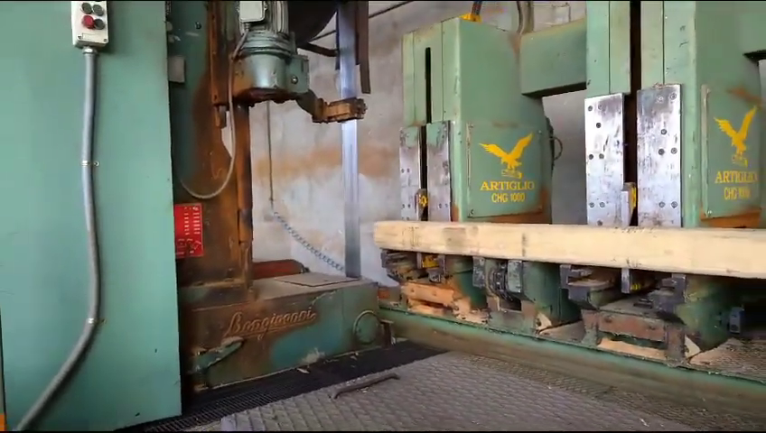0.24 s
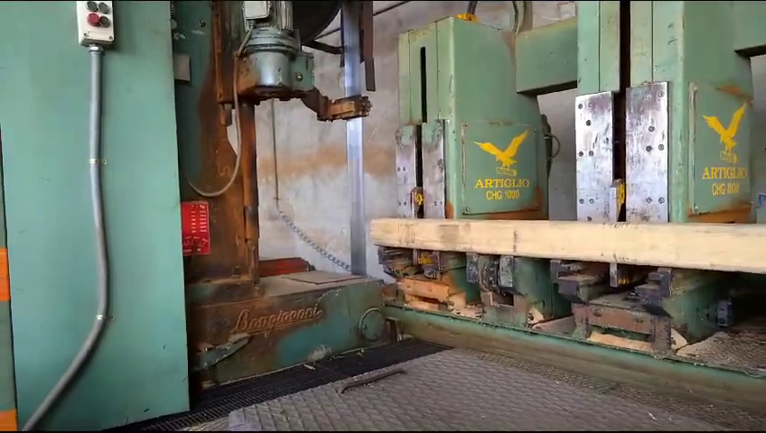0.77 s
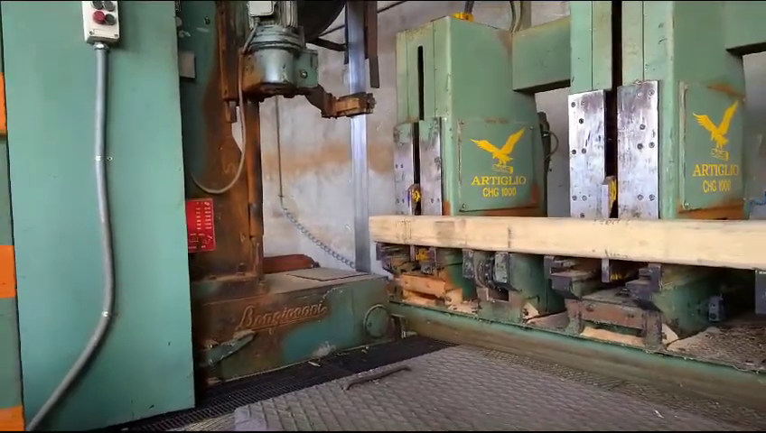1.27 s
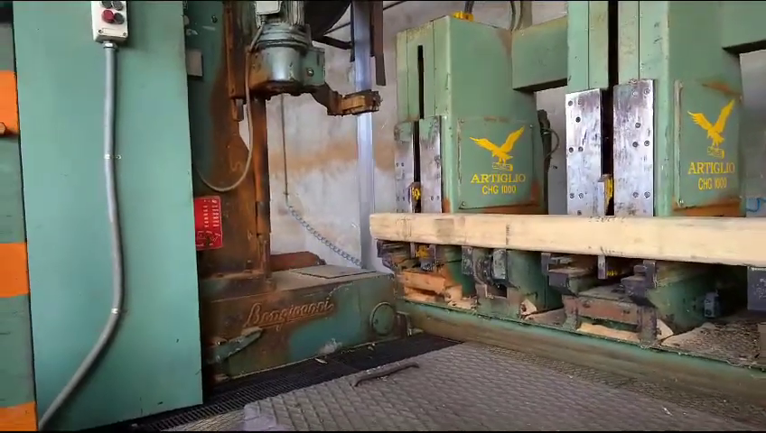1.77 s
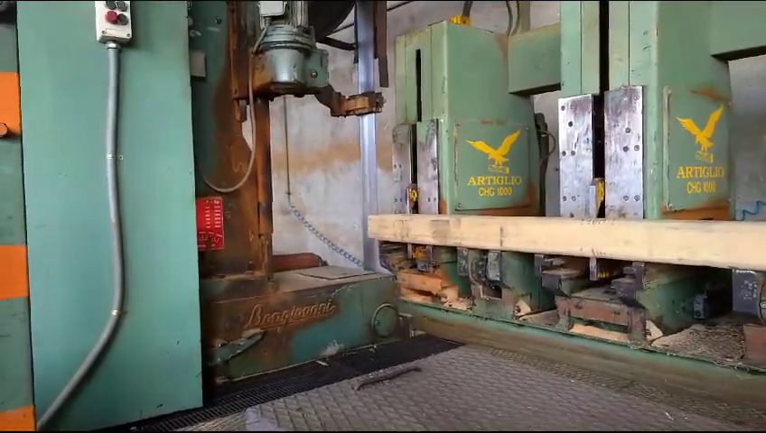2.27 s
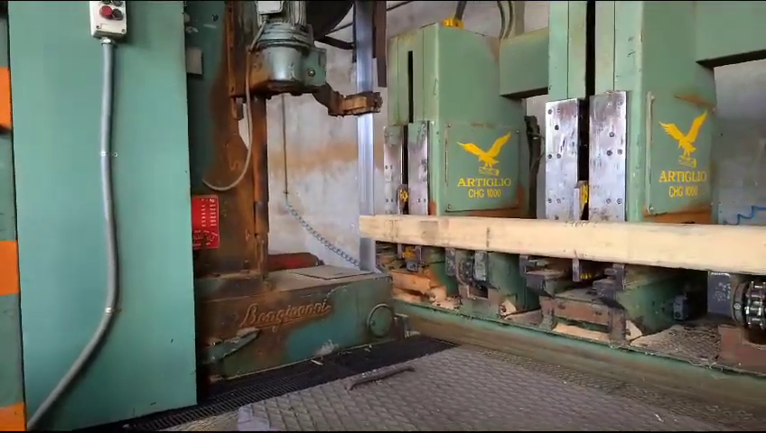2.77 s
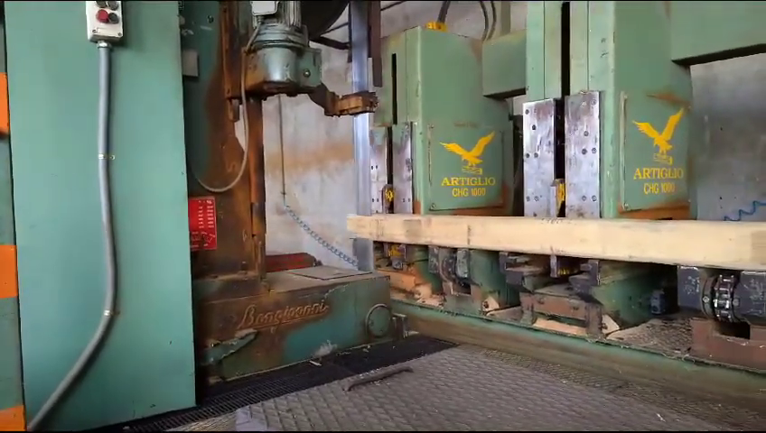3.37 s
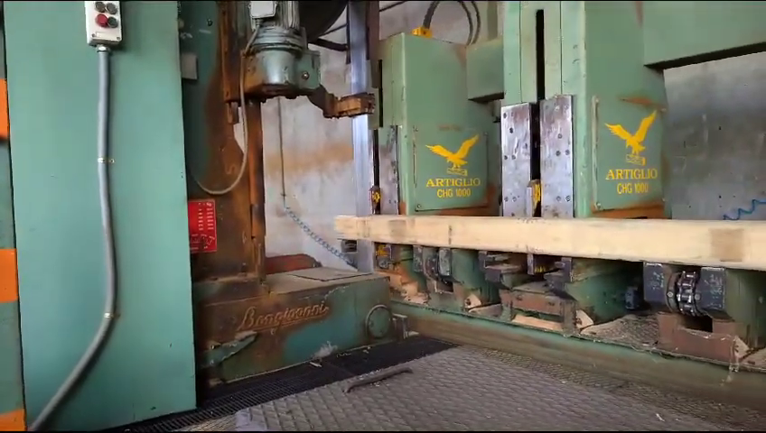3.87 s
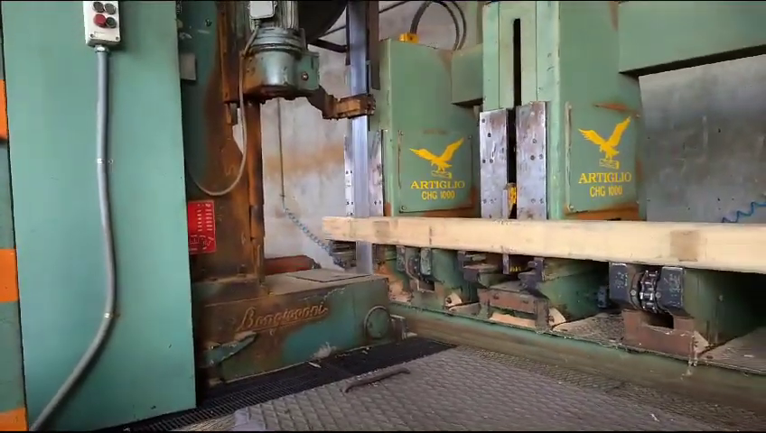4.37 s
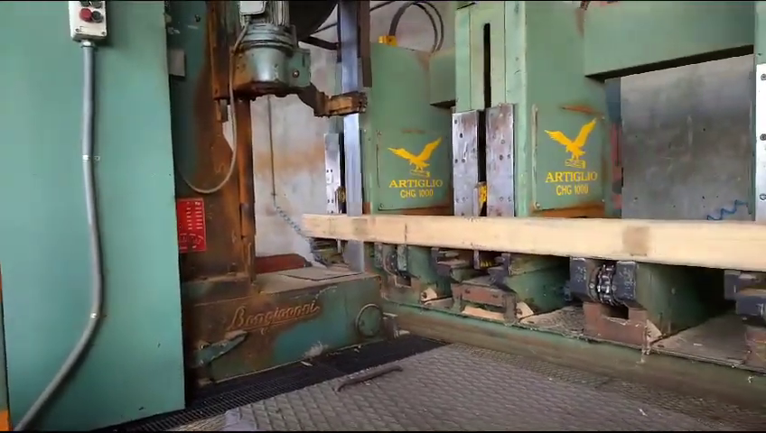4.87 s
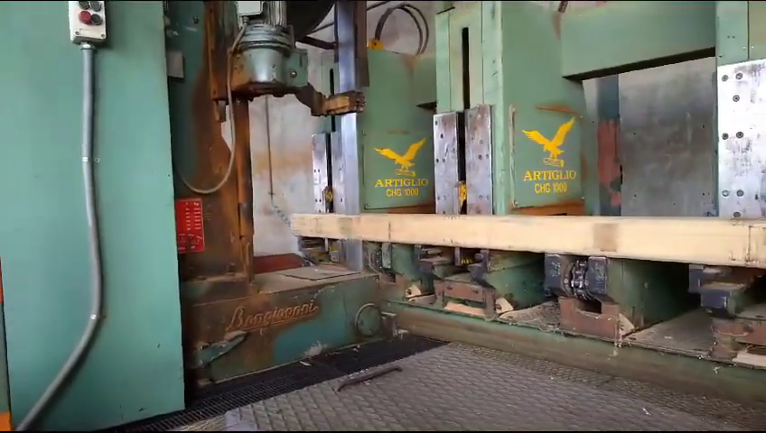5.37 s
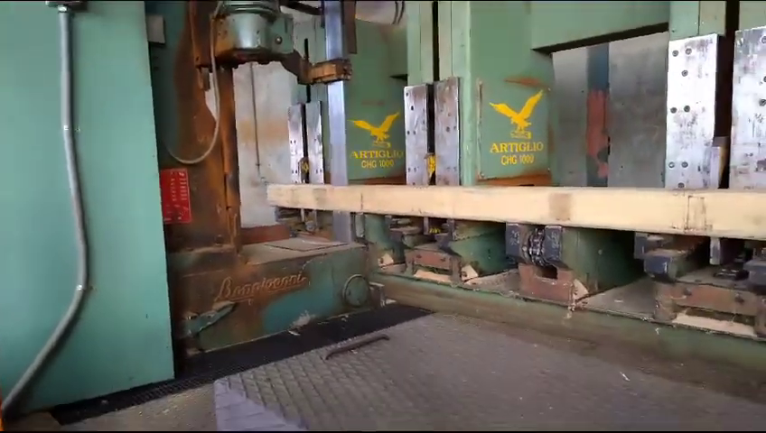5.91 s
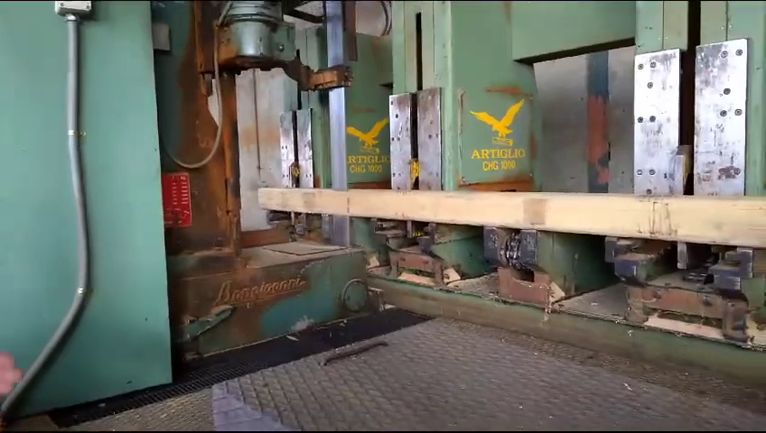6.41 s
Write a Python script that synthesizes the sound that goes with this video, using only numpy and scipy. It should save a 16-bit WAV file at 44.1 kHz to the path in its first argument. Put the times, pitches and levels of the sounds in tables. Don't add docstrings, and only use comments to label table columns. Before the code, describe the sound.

In a sawmill hall, a big band saw runs free for just over a second: broad motor and extraction roar, low hum, a thin whistle pulsing a few times a second. Then the teeth bite abruptly into a beam, a loud raspy metallic whine with bright chip hiss. It continues without a break, gradually easing, with a short squeak near the end. Stereo phone microphone a few metres away.

```python
import sys
import numpy as np
from scipy import signal
from scipy.fft import rfft, irfft
from scipy.io import wavfile
from scipy.ndimage import uniform_filter1d

SR = 44100
rng = np.random.default_rng(int(sys.argv[2]) if len(sys.argv) > 2 else 0)


def magnitude_from_level(level_db):
    exponent = np.asarray(level_db, float) / 20
    return 10 ** exponent


def wav_record(signal):
    frames = np.transpose(np.atleast_2d(signal))
    bounded = np.clip(frames, -1, 1)
    quanta = np.round(bounded * 32767).astype(np.int16)
    wavfile.write(sys.argv[1], SR, quanta)


N = 293265
T = np.arange(N) / SR

TOOTH_HZ = 795.5
BITE_S, BITE_RISE_S = 1.284, .022


def curves(table):
    s, *columns = np.transpose(table)
    return [np.interp(T, s, c) for c in columns]


def along(table, hz):
    f, v = np.transpose(table)
    return np.interp(np.log(hz + 1), np.log(f + 1), v)


def walk(rate, count=N, sr=SR, channels=1):
    k = max(int(sr / rate), 1)
    w = np.repeat(rng.standard_normal((channels, count // k + 1)), k, axis=1)[:, :count]
    w = uniform_filter1d(uniform_filter1d(w, k), k)
    return w / w.std()


def spell(start_s, length_s, edge_s):
    inside_s = np.minimum(T - start_s, start_s + length_s - T)
    return np.clip(inside_s / edge_s + .5, 0, 1)


def bump(hz, centre_hz, width_hz):
    return 1 / (1 + (2 * (hz - centre_hz) / width_hz) ** 2)


# frequency in Hz, lead of the left port in radians.
PORT_LEAD = [(1000, 0), (4000, .3), (8000, .9), (11000, 1.0), (13000, 1.9), (15000, 2.6)]


def port_delay(hz):
    return np.exp(-1j * along(PORT_LEAD, hz))


def wash(gain_db, like, size, lo_hz, hi_hz, flicker_db, flicker_hz, swell_db):
    hz, s, z = signal.stft(rng.standard_normal((2, N)), SR, nperseg=size)
    frames = 2 * SR / size
    patches = walk(flicker_hz, count=len(s), sr=frames, channels=24)
    place = 23 * np.sqrt(hz / hz[-1])
    low = place.astype(int).clip(0, 22)
    share = (place - low)[:, None]
    db = flicker_db * ((1 - share) * patches[low] + share * patches[low + 1])
    db = db + swell_db * walk(flicker_hz, count=len(s), sr=frames)

    colour_db, shape_db, balance_db = gain_db(hz, s)
    inside = (hz > lo_hz) & (hz < hi_hz)
    colour = magnitude_from_level(colour_db) / np.sqrt(np.sum(magnitude_from_level(2 * colour_db[inside])) / len(hz))

    c = along(like, hz).clip(-.95, .95)[:, None]
    mid, side = z[0] * np.sqrt((1 + c) / 2), z[1] * np.sqrt((1 - c) / 2)
    gain = colour[:, None] * magnitude_from_level(db + shape_db) / np.sqrt((1 + c) / 2)
    left = (mid + side) * magnitude_from_level(balance_db / 2)
    right = (mid - side) * port_delay(hz)[:, None] * magnitude_from_level(-balance_db / 2)
    pair = np.array([left, right])
    return signal.istft(pair * gain / np.sqrt(2), SR, nperseg=size)[1][:, :N]


def bite():
    return np.clip((T - BITE_S) / BITE_RISE_S, 0, 1)


# time in seconds, level in dB.
CUT = [(1.3, -18), (1.6, -18), (2.64, -20), (2.85, -22.5), (3.07, -22), (3.31, -24), (3.36, -21),
       (3.65, -23), (3.68, -27), (3.73, -23), (3.94, -23.5), (5.49, -24.5), (6.11, -26.5), (6.65, -25)]


def cut_db():
    return curves(CUT)[0] + 21.5


def beam_db():
    memory_s = .5
    return uniform_filter1d(cut_db(), int(memory_s * SR))


def cut_pan_db():
    turn_s, turn_length_s = 2.7, .34
    return -2.6 * np.clip(1 - (T - turn_s) / turn_length_s, 0, 1)


# start in seconds, length in seconds, resonance in Hz, lift in dB.
SWELLS = [(1.27, .165, 4000, 10), (1.32, 0.42, 2400, 4.5), (1.28, 0.16, 4800, 6), (1.55, .5, 1600, 3),
          (1.43, .57, 4000, 0.5), (1.85, 0.19, 800, 4), (1.3, 0.32, 800, 5.5), (2.0, .25, 7200, 2.5),
          (2.35, .1, 4000, -3), (2.5, 0.72, 1600, 7), (2.603, 1.08, 3200, 5), (2.6, .2, 3200, 3),
          (2.885, 0.195, 3200, 5.5), (3.268, 0.097, 3200, 5.5), (2.9, .3, 5600, 2), (2.994, 0.12, 800, 8),
          (3.35, 0.32, 4000, 4), (3.498, 0.067, 1600, 12), (3.655, 0.24, 8000, 5), (4.1, .2, 800, 3.5),
          (4.75, 0.18, 4000, 7), (5.55, .33, 5600, 2.5), (5.6, 0.67, 9550, -7), (6.204, .12, 6400, 4),
          (6.347, 0.34, 7200, 4.5)]


def swell_db(order):
    edge_s = .027
    return sum(db * spell(s, length, edge_s) for s, length, hz, db in SWELLS if round(hz / TOOTH_HZ) == order)


# frequency in Hz, level in dB per Hz.
HALL_COLOUR = [(20, -46), (60, -28.5), (190, -19.5), (260, -13.5), (500, -7), (900, -3.5), (1700, -0.5),
               (2600, -6), (3200, -8), (6000, -10), (10000, -10), (13000, -16), (14700, -15.5),
               (16500, -18)]
# frequency in Hz, left-right likeness from -1 to 1.
HALL_LIKE = [(60, 0.23), (130, 0.54), (290, 0.7), (640, 0.74), (1410, 0.54), (3100, 0.27), (6820, -0.057),
             (15000, 0.16)]
# frequency in Hz, left minus right in dB.
HALL_BALANCE = [(60, -1.5), (110, -1), (200, 0), (380, 0.0), (700, -0.5), (1290, 0.5), (2380, -0.5),
                (4400, -2.5), (8120, -1.5), (15000, -5.5)]
# frequency in Hz, width in Hz, lift in dB.
CASING = [(236.2, 5.7, 5.5), (412.6, 15.6, 8), (494, 6.2, 2), (597.5, 11.5, 9), (681.6, 12, 6),
          (781, 13, 6), (1242, 18, 4.5), (1530, 30, 3), (1495, 42, 3.5), (1748, 68, 5), (2254, 34, 8),
          (2457, 120, 7), (5170, 61, 6.5)]
# time in seconds, level in dB.
ROAR = [
    (0, -33.5),
    (1.3, -33),
    (1.8, -32),
    (2.4, -34),
    (3.3, -37),
    (4.0, -36),
    (4.9, -36),
    (5.4, -37.5),
    (6.0, -37),
    (6.65, -38),
]


def hall_roar():
    def gain_db(hz, s):
        rings = sum(db * bump(hz, f, w) for f, w, db in CASING)
        ripple = walk(1 / 11, count=len(hz), sr=1 / hz[1])[0]
        rings = rings + 2.2 * ripple.clip(-1.5, 1.5) * (hz < 1500)
        feed = -.5 * s * bump(hz[:, None], 300, 200)
        level = np.interp(s, *np.transpose(ROAR))
        return along(HALL_COLOUR, hz) + rings, level + feed, along(HALL_BALANCE, hz)[:, None]

    roar = wash(gain_db, HALL_LIKE, size=4096, lo_hz=200, hi_hz=1100, flicker_db=.6, flicker_hz=6, swell_db=.15)
    return roar * magnitude_from_level(3.5)


HUM_HZ = [95, 299]


def motor_hum():
    roar_db = curves(ROAR)[0]
    below_db = [-37.5 + 12 * spell(3.2, 4, .49), -20 + 6.5 * spell(1.35, 1.4, .49)]
    out = np.zeros(N)
    for hz, db in zip(HUM_HZ, below_db):
        level = magnitude_from_level(roar_db + db + 2.5 * walk(7.5)[0])
        out += level * np.sin(2 * np.pi * hz * T + .45 * walk(3.08)[0])
    return out


def tooth_whistle():
    whistle_hz, loop_s, weld_s = 796.5, .279, .25
    slip = .04 * bite() * walk(5)[0]
    throb = np.cos(np.pi * ((T - weld_s) / loop_s + slip)) ** 4
    throb = throb + .35 * np.clip((T - BITE_S) / 3, 0, 1) * (1 - throb)
    db = curves(ROAR)[0] + 1 - bite() + swell_db(order=1)
    db = db + bite() * (2 * walk(24.7)[0] - 5)
    return throb * magnitude_from_level(db) * np.sin(2 * np.pi * (whistle_hz * T + slip))


# time in seconds, pitch in Hz, level in dB.
SQUEAK = [
    (5.45, 2375, -42),
    (5.49, 2380, -32),
    (5.525, 2378, -25),
    (5.555, 2390, -26),
    (5.59, 2430, -27),
    (5.615, 2395, -33),
    (5.645, 2375, -33),
    (5.67, 2370, -44),
]


def squeak():
    hz, db = curves(SQUEAK)
    on = np.clip(np.minimum(T - SQUEAK[0][0], SQUEAK[-1][0] - T) / .02, 0, 1)
    level = np.sqrt(2) * on * magnitude_from_level(db + 1.5 * walk(60)[0])
    tone = level * np.sin(2 * np.pi * np.cumsum(hz) / SR + .3 * walk(90)[0])
    return tone * magnitude_from_level(np.array([[.6], [-.6]]))


# frequency in Hz, flutter per second, rms level in dB.
BLADE_RINGS = [(7310, 73, -47), (8670, 140, -41)]


def blade_rings():
    out = np.zeros((2, N))
    for hz, rate, db in BLADE_RINGS:
        w = walk(rate, channels=4)
        left, apart = w[0] + 1j * w[1], w[2] + 1j * w[3]
        right = (.8 * left + .6 * apart) * port_delay(hz)
        turn = np.exp(2j * np.pi * hz * T)
        out += magnitude_from_level(db + .46 * beam_db()) * np.real(np.array([left, right]) * turn)
    return out * bite()


# frequency in Hz, level in dB per Hz.
CHIP_COLOUR = [(600, -24.5), (1500, -4), (2500, -1.5), (4000, -1), (6500, -2), (10000, 0), (13000, -1),
               (14700, 2), (16500, 4)]
# frequency in Hz, left-right likeness from -1 to 1.
CHIP_LIKE = [(60, 0.37), (130, 0.49), (290, 0.71), (640, 0.69), (1410, 0.26), (3100, 0.13), (6820, 0.3),
             (15000, 0.036)]


def chips():
    def gain_db(hz, s):
        cut, beam, pan = (np.interp(s, T, c) for c in (cut_db(), beam_db(), cut_pan_db()))
        low = -60.5 + 1.14 * beam
        hiss = -59.5 + 1.18 * cut
        top = -64.5 + 1.6 * cut
        low_share = np.interp(hz, [4500, 7000], [1, 0])[:, None]
        top_share = np.interp(hz, [10500, 12500], [0, 1])[:, None]
        shape = hiss + low_share * (low - hiss) + top_share * (top - hiss)
        entry = np.exp(-np.abs(s - BITE_S) / .2) * bump(hz[:, None], 5000, 1000)
        return along(CHIP_COLOUR, hz), shape + 6 * entry, pan

    hiss = wash(gain_db, CHIP_LIKE, size=256, lo_hz=6100, hi_hz=11820, flicker_db=1.1, flicker_hz=20, swell_db=1.52)
    return hiss * bite() * magnitude_from_level(36)


# order of the tooth rate, rms level in dB.
BLADE = [(2, -37.4), (3, -34.0), (4, -37.6), (5, -37.3), (6, -39.3), (7, -37.1), (8, -33.8), (9, -31.9),
         (10, -32.5), (11, -31.4), (12, -27.2), (13, -30.5), (14, -35.2), (15, -36.0), (16, -34.1),
         (17, -34.3), (18, -41.5), (19, -36.8)]
FOLLOW = [1.9, 1.53, 1.25, 1.9, 1.2, 0.16, 0.54, 1.05, 1.1, 1.5, 1.46, 1.4, 2.17, 1.3, 1.3, 0.54, .5, 0.21]
ORDER_TRIM_DB = [-2.5, -4, -2, -2.5, 0, 0.3, -0.1, 0.7, 1.5, 0.4, 0.9, 0.8, 2, 4.5, 2.5, -2.5, -14, 6.5]


def teeth():
    cut, beam, pan_db = cut_db(), beam_db(), cut_pan_db()
    smear_hz, skirt_hz, alike = 14, 44, .8
    cycles = TOOTH_HZ * np.cumsum(1 + .0014 * walk(14)[0]) / SR
    load_db = 1.28 * walk(13)[0]
    out = np.zeros((2, N))
    for (k, db), follow, trim_db in zip(BLADE, FOLLOW, ORDER_TRIM_DB):
        db = db + trim_db + swell_db(k) + load_db * min(k / 8, 1) ** 2
        db = db + follow * (cut if k > 6 else beam)
        db = db + 1.87 * walk(11)[0] * np.clip((k - 5) / 4, 0, 1)

        share = .5 * min(k / 9, 1)
        core, skirt = walk(smear_hz * k, channels=4), walk(skirt_hz * k, channels=4)
        w = (np.sqrt(1 - share) * core + np.sqrt(share) * skirt) / np.sqrt(2)
        both, apart = w[0] + 1j * w[1], w[2] + 1j * w[3]

        steady = (.98 if k > 3 else .7) / (1 + (k / 6.8) ** 6)
        both = np.sqrt(steady) + np.sqrt(1 - steady) * both

        right = (alike * both + np.sqrt(1 - alike ** 2) * apart) * port_delay(k * TOOTH_HZ)
        turn = np.exp(2j * np.pi * (k * cycles + rng.random()))
        out += np.sqrt(2) * magnitude_from_level(db) * np.real(np.array([both, right]) * turn)
    return out * magnitude_from_level(np.array([pan_db, -pan_db]) / 2) * bite() * magnitude_from_level(-.2)


def scene():
    hall = hall_roar() + motor_hum() + tooth_whistle()
    return hall + squeak() + blade_rings() + chips() + teeth()


def top_cut(x):
    return signal.sosfilt(signal.butter(12, 15720, fs=SR, output="sos"), x)


def record(dry):
    spectrum = rfft(np.tanh(.9 * dry) / .9)
    hz = np.arange(spectrum.shape[1]) * SR / N
    mix = irfft(spectrum * (hz < 15720), N)
    return top_cut(mix)


dry = scene()
out = record(dry)
wav_record(out)
```